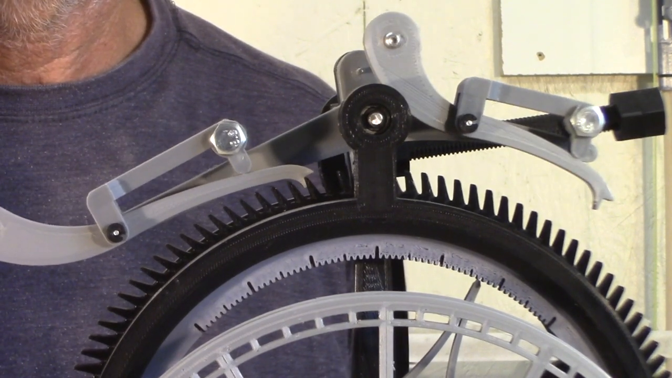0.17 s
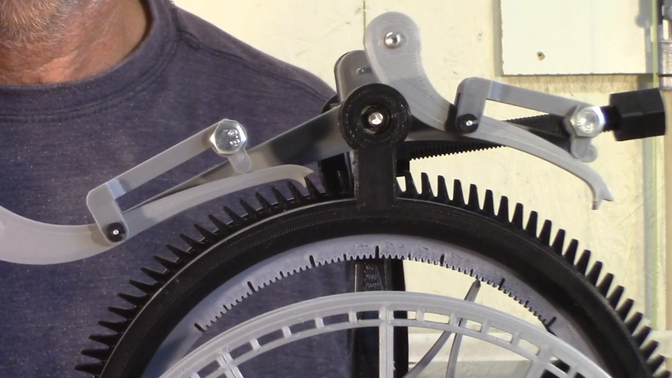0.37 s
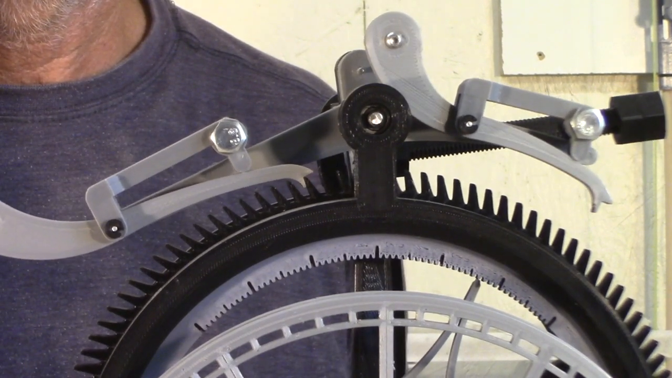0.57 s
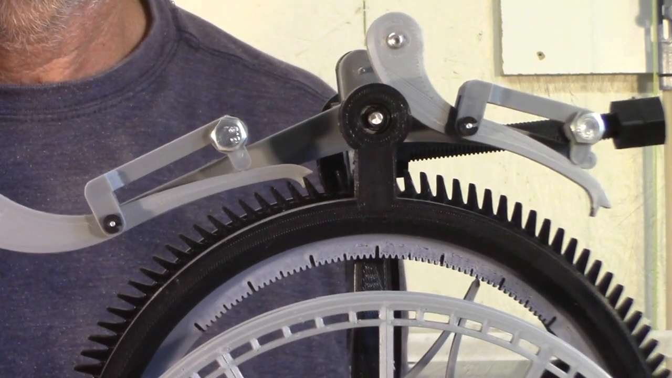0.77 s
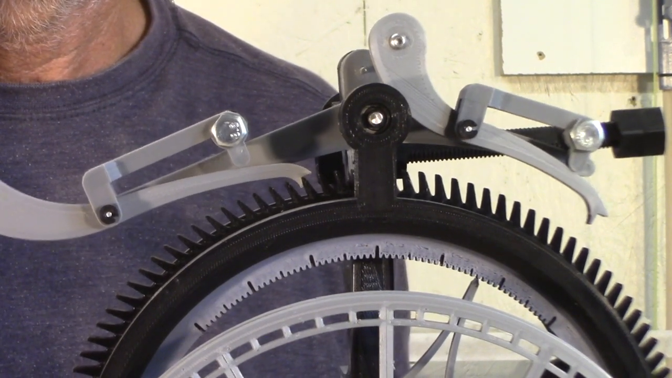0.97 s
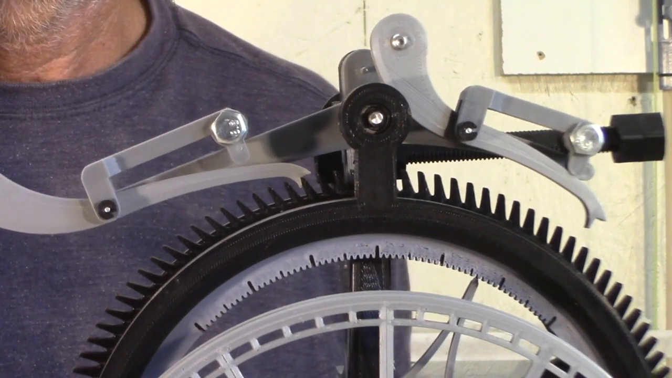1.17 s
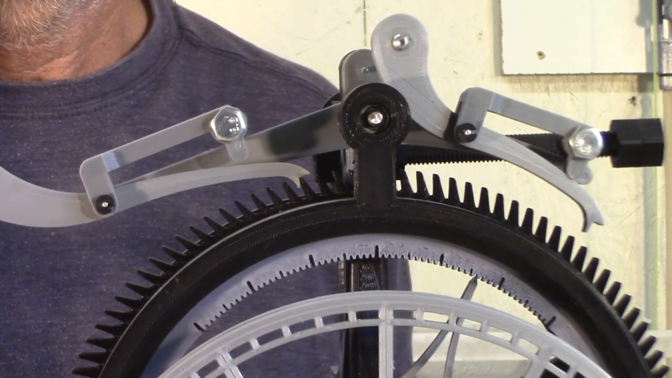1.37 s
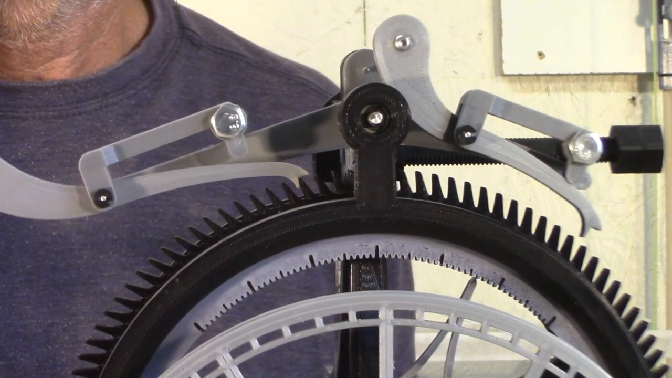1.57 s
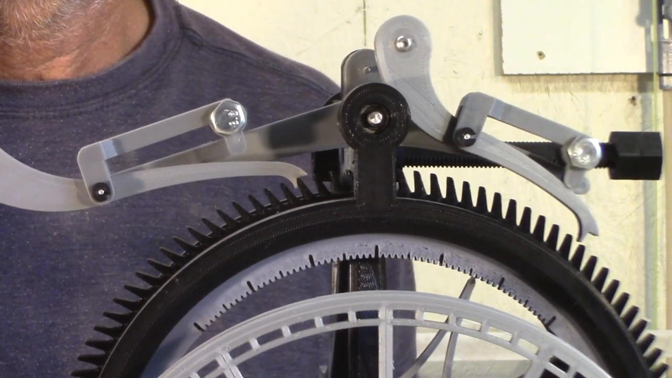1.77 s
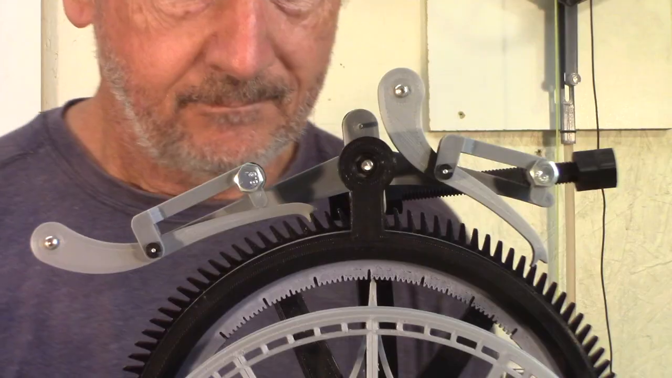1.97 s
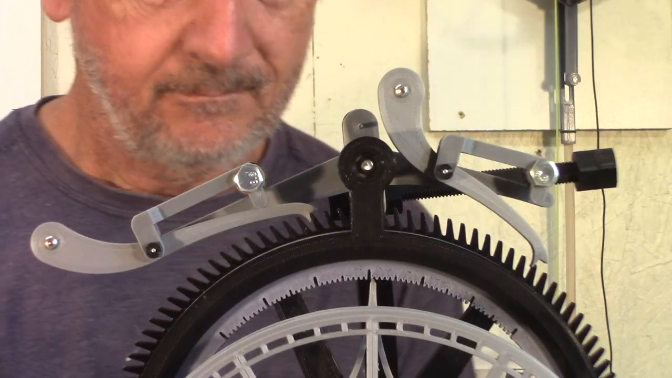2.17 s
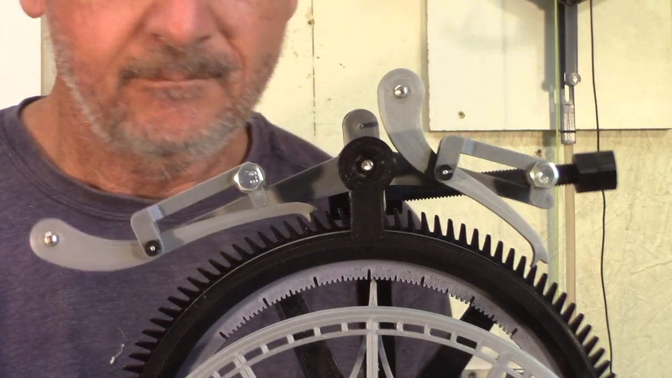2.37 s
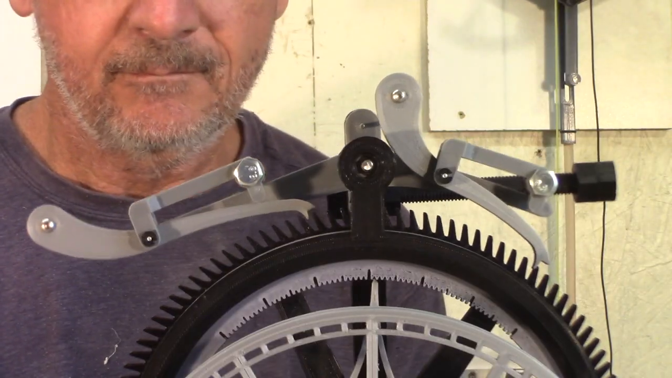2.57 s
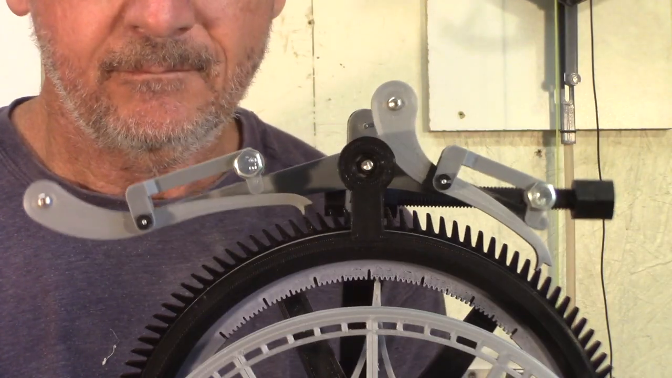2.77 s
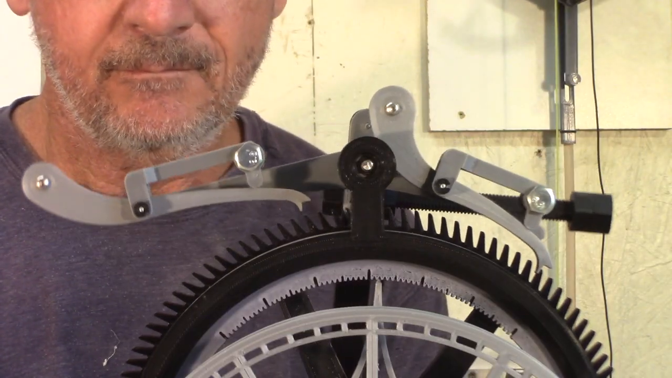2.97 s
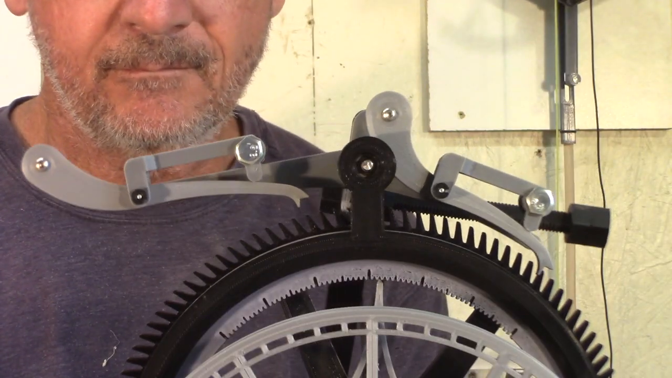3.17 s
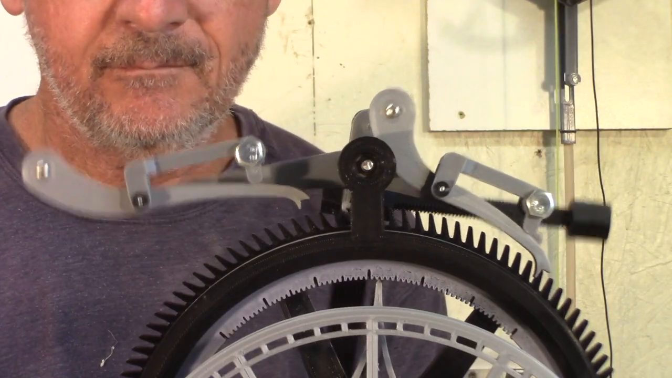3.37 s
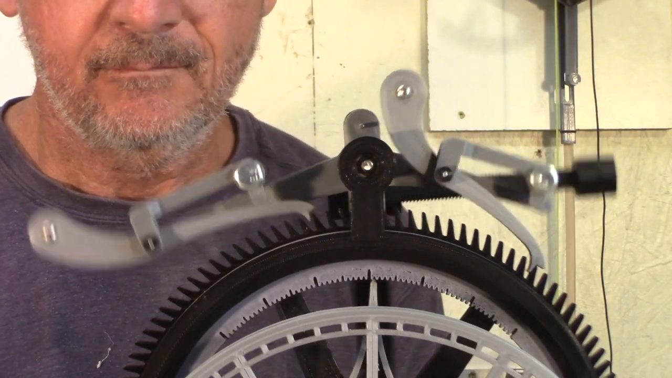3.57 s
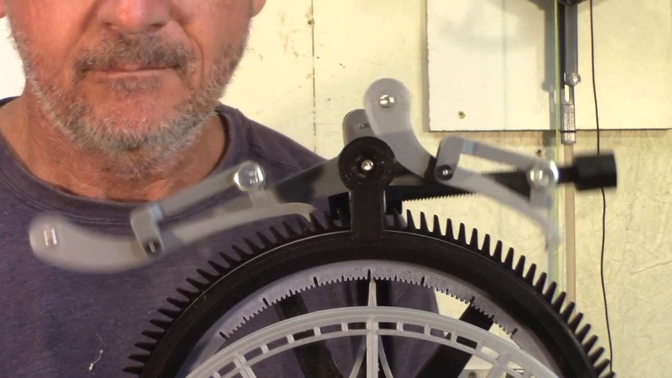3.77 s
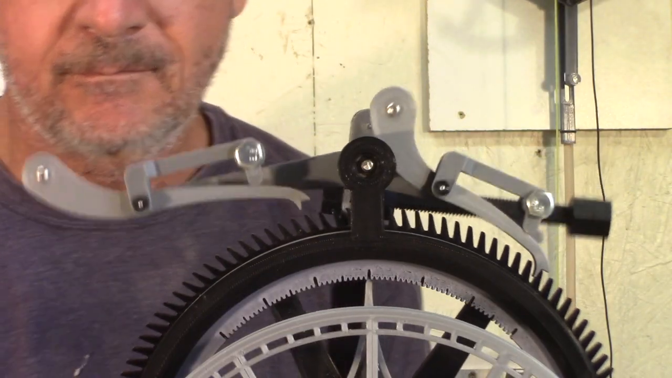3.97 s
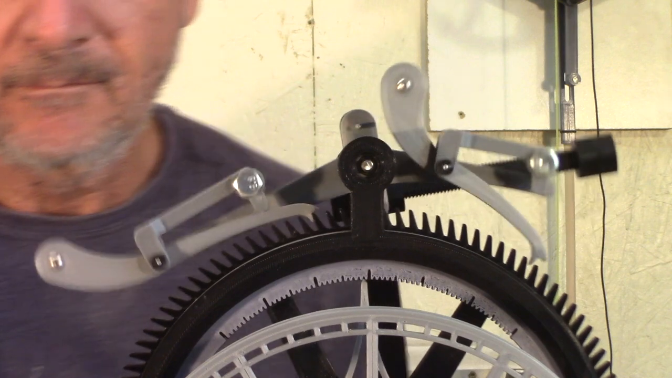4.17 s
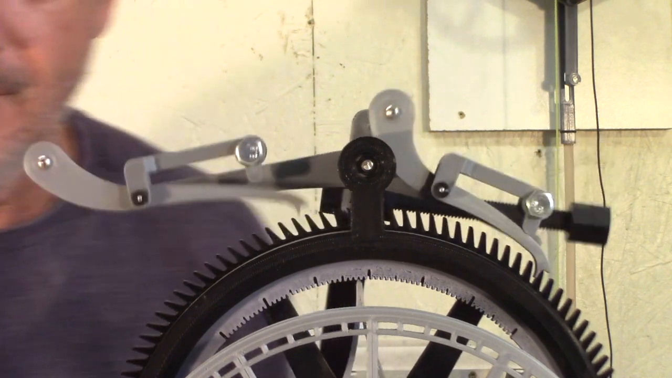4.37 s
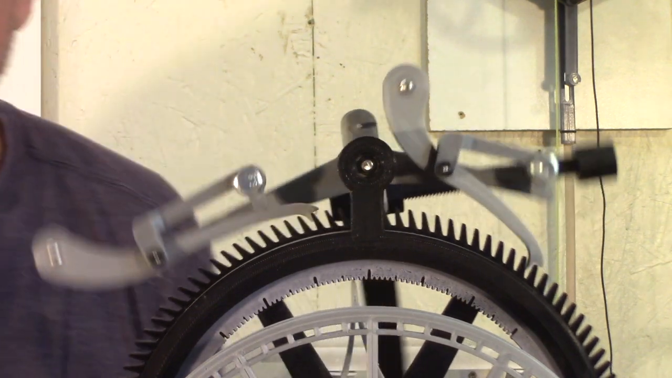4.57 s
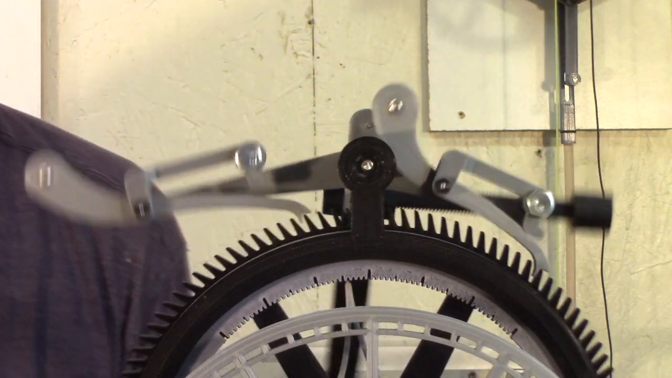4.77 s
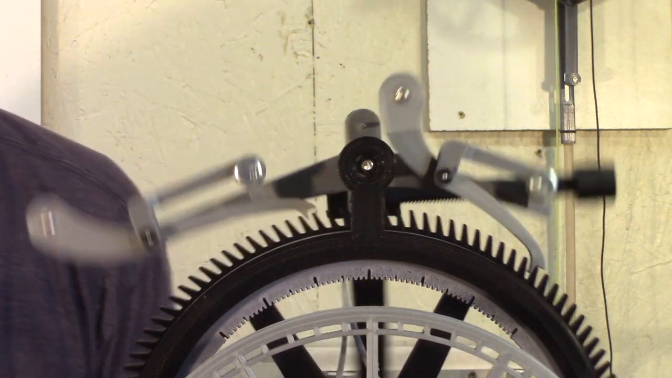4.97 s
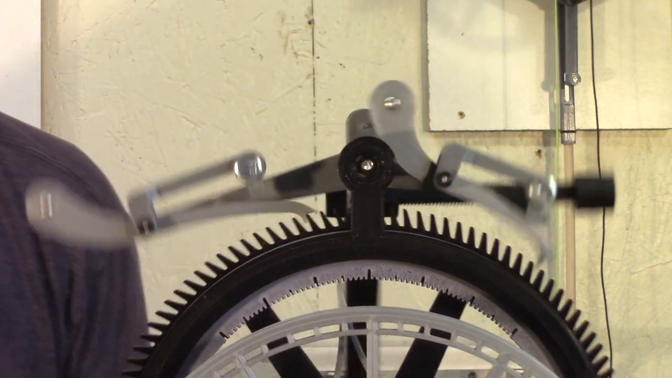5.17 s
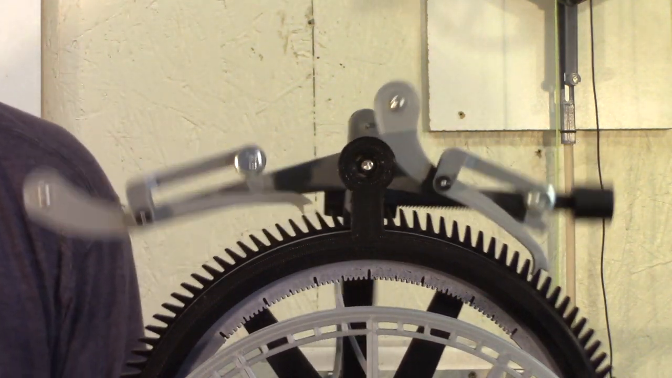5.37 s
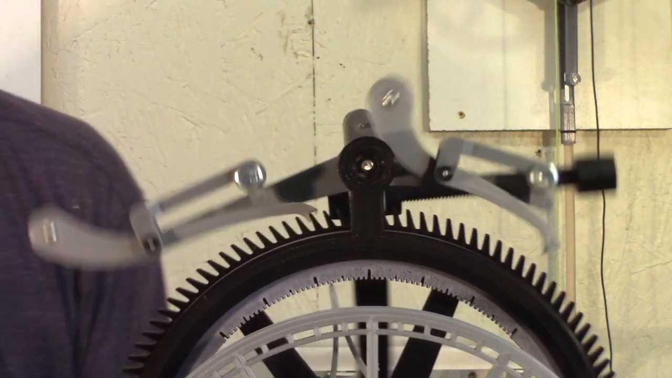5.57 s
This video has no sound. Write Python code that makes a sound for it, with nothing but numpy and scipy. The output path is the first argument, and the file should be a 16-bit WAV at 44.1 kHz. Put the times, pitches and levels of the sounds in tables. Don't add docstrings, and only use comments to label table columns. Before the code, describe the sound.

A man handles a large plastic clock wheel, close-miked with a short room echo. At first there is only hiss, hum, sleeve brushing and a dull tock. After three seconds small clicks gather, then loud woody clacks, sharp snaps, rattles and light scraping follow quickly in a regular, busy beat, still running at the end.

```python
import sys
import numpy as np
from scipy import signal
from scipy.fft import rfft, irfft
from scipy.io import wavfile
from scipy.ndimage import uniform_filter1d

SR = 44100
rng = np.random.default_rng(int(sys.argv[2]) if len(sys.argv) > 2 else 0)


def digitize_waveform(pressure):
    field = np.atleast_2d(pressure).T
    bounded = np.clip(field, -1, 1)
    quanta = np.round(bounded * 32767).astype(np.int16)
    wavfile.write(sys.argv[1], SR, quanta)


def attenuation_scalar(level_db):
    decades = np.asarray(level_db, float) / 20
    return 10 ** decades


N = 247468
LENGTH = 12288


def shape(table, hz):
    f, v = np.transpose(table)
    return np.interp(np.log(np.maximum(hz, 1)), np.log(f), v)


def unit(x):
    return x / np.sqrt(uniform_filter1d(x ** 2, 176).max() + 1e-18)


# (frequency [Hz], density [dB per Hz])
AIR_SPECTRUM = [(15, -53), (25, -9), (43, -8), (64, 1.5), (82, -9), (114, -4.5), (137, -4), (354, -5),
                (451, -8.5), (489, -8), (775, -10.5), (887, -12), (5730, -25.5), (14800, -31.5),
                (16000, -35)]
# (frequency [Hz], level [dB], phase waver [rad])
HUM_LINES = [(60.7, -58.5, .7), (118, -67.5, .9), (712, -65, 3.5), (776, -63.5, 5.6)]


def air():
    air_db, bass_db = -48, -3.5
    t, hz = np.arange(N) / SR, np.fft.rfftfreq(N, 1 / SR)
    noise = rfft(rng.standard_normal(N)) * attenuation_scalar(shape(AIR_SPECTRUM, hz))
    noise *= attenuation_scalar(air_db) / np.std(irfft(noise, N))
    low = 1 / (1 + (hz / 1500) ** 2)
    hum = 0
    for line_hz, db, unsteady in HUM_LINES:
        waver = np.interp(t, np.linspace(0, t[-1], 60), rng.standard_normal(60))
        hum = hum + attenuation_scalar(db + 2.0 * waver) * np.sin(2 * np.pi * line_hz * t + unsteady * waver)
    return irfft(noise * (low * attenuation_scalar(bass_db) + 1 - low), N) + hum


def room(x):
    tail_db, t60_s, dull_hz = -15.5, 0.36, 5240
    t = np.arange(SR // 2) / SR
    tail = rng.standard_normal(len(t)) * 1000. ** (-t / t60_s) * (t > .006)
    tail = signal.lfilter(*signal.butter(1, dull_hz, fs=SR), tail)
    return x + attenuation_scalar(tail_db) * signal.fftconvolve(x, tail / np.linalg.norm(tail))[:N]


# (middle [s], length [s], level [dB], centre frequency [Hz])
RUSTLES = [
    (.15, 0.54, -63, 500),
    (0.256, 0.22, -62.5, 8500),
    (0.294, 0.16, -59, 2250),
    (1.26, 0.24, -57.5, 600),
    (1.28, 0.15, -56.5, 2290),
    (2.418, 0.39, -55.5, 497),
    (2.573, 0.043, -58.5, 8500),
    (2.63, 0.14, -58, 2000),
    (2.658, 0.25, -54.5, 500),
]


def rustle():
    t, out = np.arange(N) / SR, np.zeros(N)
    for s, length_s, db, centre_hz in RUSTLES:
        near = np.abs(t - s) < length_s / 2
        spread = 1 + 1000 / (centre_hz + 500)
        edges_hz = (centre_hz / spread, centre_hz * spread)
        band = signal.butter(2, edges_hz, "bandpass", fs=SR, output="sos")
        cloth = signal.sosfilt(band, rng.standard_normal(N)[near])
        out[near] += attenuation_scalar(db) * cloth / np.std(cloth) * np.sqrt(np.hanning(near.sum()))
    return out


def swing(t, hz, t60, rise_s):
    t = np.maximum(t, 0)
    return np.sin(2 * np.pi * hz * t) * (1 - np.exp(-(t / rise_s) ** 2)) * 1000. ** (-t / t60)


# (time [s], frequency [Hz], level [dB], t60 [s])
TAPS = [(.298, 2900, -41, 0.039), (1.525, 1260, -24.5, 0.021), (1.523, 1500, -41, 0.052),
        (1.524, 1670, -35, 0.026), (1.525, 2900, -44, .03), (2.672, 3050, -42, 0.027),
        (2.801, 3250, -36, 0.029), (3.222, 1470, -26.5, 0.06), (3.224, 700, -30.5, 0.12),
        (3.424, 527, -32, 0.1), (3.625, 504, -32, 0.16), (3.668, 3000, -45, .05), (5.487, 1160, -26, 0.053)]


def tap():
    t = np.arange(N) / SR
    return sum(attenuation_scalar(db) * swing(t - s, hz, t60, 0.00081) for s, hz, db, t60 in TAPS)


# (time [s], ring [dB], boom re ring [dB], crack re ring [dB])
ARM_STOPS = [
    (3.2214, -31, -3.5, -18),
    (4.155, -10, -10, -15),
    (4.6079, -8, -12, -11),
    (5.0515, -8.5, -15, -18),
    (5.4936, -8.5, -15.5, -17),
]
# (time [s], ring [dB], boom re ring [dB], crack re ring [dB])
PALLET_DROPS = [(3.7398, -15.5, -18.5, -1), (3.7657, -20.5, -11, -1.5), (3.8088, -30.5, -10, -3),
                (3.9554, -20, -15.5, -3), (4.1777, -13, -17, -10), (4.2598, -15.5, -13, -4),
                (4.283, -24.5, -17, -5), (4.6958, -12.5, -16.5, -1), (5.1487, -12.5, -18, -8),
                (5.1742, -25, -8, -4), (5.589, -10.5, -22, -7)]
# (time [s], ring [dB], boom re ring [dB], crack re ring [dB])
PALLET_LIFTS = [
    (4.0265, -25.5, -6.5, -6),
    (4.4126, -19.5, -19, -13),
    (4.4514, -33.5, -9, -13),
    (4.8599, -19.5, -18, -5.5),
    (5.3044, -19.5, -17, -12.5),
]
# (time [s], ring [dB], boom re ring [dB], crack re ring [dB])
TOOTH_LOCKS = [(3.234, -29.5, -17, -13), (3.245, -27.5, -10, -18), (3.2683, -29.5, -6.5, -15),
               (3.414, -24, -13, -19), (3.5997, -27, -6, -4.5), (3.6068, -24, -18, -9),
               (3.879, -19.5, -9.5, -7), (4.0122, -21.5, -8.5, -6), (4.3191, -15, -34, -7),
               (4.329, -18.5, -10, -6), (4.4788, -20, -11.5, -6.5), (4.7717, -14, -12.5, 0),
               (4.9245, -18, -14, -5), (5.2103, -17, -21.5, -11), (5.2199, -23, -6.5, -3.5),
               (5.3522, -31, -12, -7), (5.3688, -17.5, -11.5, -11), (5.4515, -20, -26, -6),
               (4.768, -22, -31, -16)]
# (time [s], ring [dB], boom re ring [dB], crack re
# ring [dB])
ARM_SLIDES = [
    (4.106, -16, -10.5, -8.5),
    (4.5633, -16, -9.5, -6),
    (5.009, -18.5, -8.5, -7),
    (5.0653, -14, -10, -9.5),
    (5.4513, -18.5, -11, -7),
    (5.5119, -15, -8.5, -8),
]
SLIDE_CATCH_S = .009
# (blow rows, snap re crack [dB], snap delay [s],
# (panel, post, leg sway, back plate, brace) re boom [dB])
PASSED_ON = [
    (ARM_STOPS, -2, 0, (-10.5, -34, -18, -8.5, -15)),
    (PALLET_DROPS, 7.2, 0, (-14, -22, -32, -16, -28)),
    (PALLET_LIFTS, 4, 0, (-20, -22, -17, -29, -16)),
    (TOOTH_LOCKS, 0.1, 0.004, (-14.5, -10.5, -9.5, -18.5, -18)),
    (ARM_SLIDES, 9.8, SLIDE_CATCH_S, (-15, -12.5, -23, -11.5, -14)),
]
# (frequency [Hz], t60 [s], build-up [s])
STAND_MODES = [(205.7, 0.19, 0.0067), (149, 0.13, 0.012), (117.4, 0.17, 0.026), (409.2, 0.2, 0.003),
               (636.5, 0.13, 0.0037)]


def stand():
    out, t = np.zeros(N + LENGTH), np.arange(LENGTH) / SR
    for table, _, _, levels_db in PASSED_ON:
        for s, ring_db, boom_db, _ in table:
            i = int(s * SR)
            detune = 1 + rng.standard_normal(5) * (.008, .04, .03, .01, .01)
            for db, k, (hz, t60, rise_s) in zip(levels_db, detune, STAND_MODES):
                out[i:i + LENGTH] += attenuation_scalar(ring_db + boom_db + db + 6) * swing(t, hz * k, t60, rise_s)
    return out[:N]


def snaps():
    snap_hz, rattle_s, rattle_db = 7800, .03, -7
    out, t = np.zeros(N + LENGTH), np.arange(512) / SR
    band = signal.butter(1, (0.42 * snap_hz, min(0.99 * snap_hz, 16000)), "bandpass", fs=SR)
    for table, snap_db, late_s, _ in PASSED_ON:
        for s, ring_db, _, crack_db in table:
            for after_s in (0, *rng.uniform(0.22, 1, size=2) * rattle_s):
                snap = signal.lfilter(*band, rng.standard_normal(len(t))) * np.exp(-t / 0.0013)
                db = ring_db + crack_db + snap_db + rattle_db * (after_s > 0) - 200 * after_s
                i = int((s + abs(late_s) + after_s) * SR)
                out[i:i + len(t)] += attenuation_scalar(db) * snap / np.abs(snap).max()
    return out[:N]


# (frequency [Hz], density [dB per Hz])
DENSE = [(530, -24), (900, -3.5), (1290, -5), (1550, -4), (1950, 1.5), (2250, 1.5), (2500, 1), (6110, 0.5),
         (12000, -13.5), (16000, -26)]
# (frequency [Hz], t60 [s])
DENSE_T60 = [(900, 0.15), (3000, 0.04), (8000, 0.1), (15000, 0.08)]


def dense_ring():
    hz, t = np.fft.rfftfreq(LENGTH, 1 / SR), np.arange(LENGTH) / SR
    noise = rfft(rng.standard_normal(LENGTH)) * attenuation_scalar(shape(DENSE, hz))
    out = 0
    for centre in 1000 * 2. ** np.arange(5):
        share = np.clip(1 - np.abs(np.log2(np.maximum(hz, 1) / centre)), 0, 1)
        out = out + irfft(noise * share) * 1000. ** (-t / shape(DENSE_T60, centre))
    return out


# (time [s], level [dB])
DRAGS = [
    (3.8, -60),
    (4.1, -39),
    (4.51, -36.5),
    (4.9, -46),
    (5.14, -51),
    (5.53, -70),
]


def rub():
    rise_s, fall_s, wheel_free_s, wheel_db = 0.043, 0.12, 3.85, -69
    t, hz = np.arange(N) / SR, np.fft.rfftfreq(N, 1 / SR)
    slips = rng.standard_normal(N) * attenuation_scalar(3.7 * np.minimum(rng.exponential(size=N), 4))
    pallet_db = 6 / (1 + ((hz - 6000) / 500) ** 2)
    grain = irfft(rfft(slips) * attenuation_scalar(shape(DENSE, hz) + pallet_db), N)
    drag = sum(attenuation_scalar(db) * np.exp(-np.abs(t - s) / np.where(t < s, rise_s, fall_s)) for s, db in DRAGS)
    return grain / np.std(grain) * (drag + attenuation_scalar(wheel_db) * (t > wheel_free_s))


def ring(modes, spread_db):
    hz, width_hz, db = np.transpose(modes)
    width_hz = np.maximum(width_hz, hz / 80)
    luck = rng.standard_normal((2, len(hz)))
    t = np.arange(LENGTH)[:, None] / SR
    waves = np.sin(2 * np.pi * hz * (1 + .004 * luck[0]) * t) * np.exp(-np.pi * width_hz * t)
    return waves @ (attenuation_scalar(db + spread_db * luck[1]) * np.sqrt(width_hz))


# (frequency [Hz], width [Hz], level [dB])
FRAME = [(119, 49, -23), (177, 6.7, -18), (215, 30, -27), (260, 16, -19), (335, 41, -31), (402, 7.6, -38),
         (414, 15.6, 15), (440, 20, 4), (512, 22, 20), (610, 75, 6.5), (635, 61, -7), (700, 90, 0),
         (730, 8, -2)]
# (frequency [Hz], density [dB per Hz])
BENCH = [(41, -53), (70, -14.5), (190, -8), (270, -17), (400, -4), (700, -5), (1000, -9.5), (1300, -47)]


def frame_ring(deep_db):
    bench_db, bench_t60_s, band_hz = 2, .18, (103, 890)
    hz = np.fft.rfftfreq(LENGTH, 1 / SR)
    thud = irfft(rfft(rng.standard_normal(LENGTH)) * attenuation_scalar(shape(BENCH, hz) - 200 * (hz > 1000)))
    thud *= 1000. ** (-np.arange(LENGTH) / SR / bench_t60_s)
    both = unit(ring(FRAME, spread_db=0.5)) + attenuation_scalar(bench_db) * unit(thud)
    both += (attenuation_scalar(deep_db) - 1) * signal.lfilter(*signal.butter(2, 300, fs=SR), both)
    return signal.sosfilt(signal.butter(2, band_hz, "bandpass", fs=SR, output="sos"), both)


def chatter(length_s, contact_s, first_db, swell, scatter_db=4.5):
    at, size, sign = rng.random((3, 70))
    length_s = np.clip(length_s, .002, .1)
    at[:8] *= contact_s / length_s
    at[0] = 0
    db = -scatter_db * np.log(size + 0.1) - 14 * at - swell * np.exp(-at / 0.057)
    db[:8] = first_db
    knocks = np.zeros(LENGTH)
    np.add.at(knocks, (length_s * SR * at).astype(int), np.sign(sign - .5) * attenuation_scalar(db))
    return knocks


def even(knocks):
    z = rfft(knocks, 2 * LENGTH)
    return z / np.sqrt(uniform_filter1d(np.abs(z) ** 2, 200) + 1e-18)


def blows(table, modes, contact_s, first_db, swell, dense_db, deep_db, knock_db, length_s, split_hz):
    out, hz = np.zeros(N + LENGTH), np.fft.rfftfreq(2 * LENGTH, 1 / SR)
    low, middle, high = [1 / (1 + (hz / edge) ** 8) for edge in (900, split_hz, 7000)]
    push = 1 / (1 + (hz / 900) ** 2)
    first_hardest = 0.44 + np.exp(-np.arange(LENGTH) / SR / 0.0034)
    for s, ring_db, boom_db, crack_db in table:
        force = even(chatter(length_s, contact_s, first_db, swell))
        body = unit(ring(modes, spread_db=3.0)) + attenuation_scalar(dense_db) * unit(dense_ring())
        struck = force * rfft(body, 2 * LENGTH)
        knock = unit(irfft(struck * (middle - low))[:LENGTH])
        pallet = unit(irfft(struck * (high - middle))[:LENGTH])
        crack = unit(irfft(struck * (1 - high))[:LENGTH])
        crack = unit(crack * first_hardest)
        boom = unit(irfft(force * push * rfft(frame_ring(deep_db), 2 * LENGTH))[:LENGTH])
        hit = pallet + attenuation_scalar(boom_db + 6.0) * boom
        hit += attenuation_scalar(knock_db + 3.0) * knock + attenuation_scalar(crack_db - 0.1) * crack
        i = int(s * SR)
        out[i:i + LENGTH] += attenuation_scalar(ring_db - 7.5) * hit
    return out[:N]


# (time [s], ring [dB], boom re ring [dB], crack re ring [dB])
HAND_TICKS = [
    (0.2968, -44.5, -9, -20),
    (0.9794, -53, -10, -20),
    (2.3436, -45, -10, -16),
    (2.3603, -42.5, -14, -16),
    (2.6716, -43, -9, -22),
    (2.8, -39.5, -3.5, 0.5),
    (2.849, -56.5, 10, -16),
]
# (frequency [Hz], width [Hz], level [dB])
TICK = [(2000, 400, -5), (3050, 260, -1), (4100, 370, -11), (4670, 400, -13), (5700, 500, -10),
        (6700, 500, -14), (7740, 320, 2)]


def hand_ticks():
    return blows(HAND_TICKS, TICK, contact_s=0.0018, first_db=4.5, swell=3, dense_db=-5.0,
                 deep_db=2.0, knock_db=-3.5, length_s=.014, split_hz=1950)


# (frequency [Hz], width [Hz], level [dB])
TOOTH = [(2236, 84, 3), (2900, 330, 11), (3550, 150, -15), (4040, 450, 14), (5040, 85, -7), (4820, 59, 15),
         (5400, 180, -16), (5330, 34, -8.5), (5900, 70, 14), (6300, 540, -25.5), (7600, 230, 5.5),
         (8870, 150, -13), (9700, 270, 0), (12300, 63, -5.5)]


def tooth_locks():
    return blows(TOOTH_LOCKS, TOOTH, contact_s=0.0044, first_db=8.5, swell=2.7, dense_db=-1,
                 deep_db=-6.5, knock_db=-17.5, length_s=0.019, split_hz=1650)


# (frequency [Hz], width [Hz], level [dB])
LIFT = [(2410, 67, -26), (3100, 71, -13), (4095, 35, 2), (5140, 150, -13), (5600, 39, -6), (5570, 15, -11),
        (5900, 42, -5), (6150, 39, -12), (7020, 33, -26), (8000, 34, -9), (8300, 22, -24), (11150, 120, -4)]


def pallet_lifts():
    return blows(PALLET_LIFTS, LIFT, contact_s=0.0036, first_db=5.0, swell=1.9, dense_db=-6.0,
                 deep_db=-22, knock_db=-18.5, length_s=.017, split_hz=2300)


# (frequency [Hz], width [Hz], level [dB])
PALLET = [(1840, 100, 9), (3080, 200, 3), (4160, 33, 6), (3810, 100, 0), (4700, 110, -25), (5870, 80, 8),
          (7120, 780, -2), (8600, 230, -9), (9360, 94, -11), (11830, 170, -18)]


def pallet_drops():
    return blows(PALLET_DROPS, PALLET, contact_s=.002, first_db=13, swell=1.3, dense_db=-5.5,
                 deep_db=-10, knock_db=-16, length_s=.021, split_hz=2640)


# (frequency [Hz], width [Hz], level [dB])
SLIDE = [(2860, 105, -8), (2620, 110, -2), (4115, 28, 12), (4920, 45, 8), (5000, 46, -25), (5900, 160, -5),
         (6000, 130, 15), (5900, 36, -5), (6680, 48, -39), (7600, 35, 8), (8250, 37, 7), (9430, 42, -5)]


def arm_slides():
    return blows(ARM_SLIDES, SLIDE, contact_s=.006, first_db=5.0, swell=27, dense_db=-2.5,
                 deep_db=-2.5, knock_db=-13.0, length_s=.028, split_hz=2300)


# (frequency [Hz], width [Hz], level [dB])
ARM = [(1560, 164, 11), (1420, 90, -5), (2260, 100, -6), (2900, 360, 1), (4000, 35, -8), (4700, 33, -4),
       (5070, 59, -29), (6160, 80, -35), (6340, 88, -25), (8200, 260, -33), (9400, 260, -40),
       (10400, 69, -28), (11200, 440, -17)]


def arm_stops():
    return blows(ARM_STOPS, ARM, contact_s=.004, first_db=11.5, swell=2.1, dense_db=-6.5,
                 deep_db=0, knock_db=-6, length_s=.033, split_hz=1990)


def scene():
    clock = arm_stops() + pallet_drops() + pallet_lifts()
    clock += tooth_locks() + arm_slides() + hand_ticks()
    clock += snaps() + rub()
    clock = signal.lfilter(*signal.butter(4, 14200, fs=SR), clock)
    return (room(clock + stand()) + tap() + rustle() + air())[None]


def roll_off(x):
    return signal.sosfilt(signal.butter(12, 16500, fs=SR, output="sos"), x)


def record(dry):
    ceiling, top_hz = 0.42, 15700
    held = ceiling * np.tanh(dry / ceiling)
    mix = signal.sosfilt(signal.ellip(8, .2, 30, top_hz, fs=SR, output="sos"), held)
    return roll_off(mix)


dry = scene()
out = record(dry)
digitize_waveform(out)
```